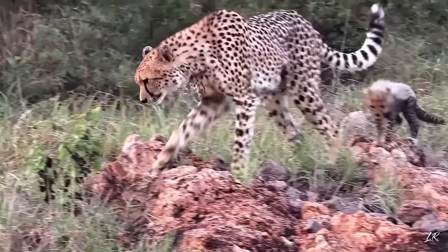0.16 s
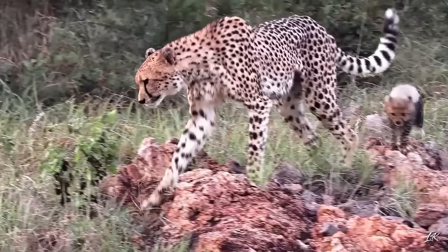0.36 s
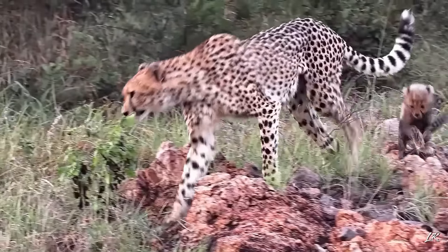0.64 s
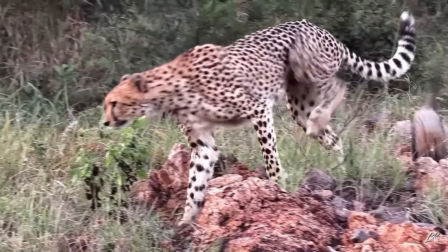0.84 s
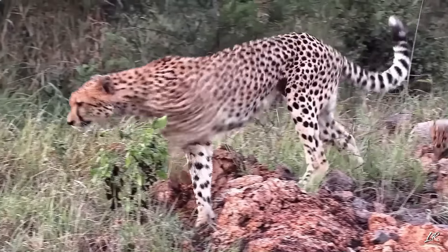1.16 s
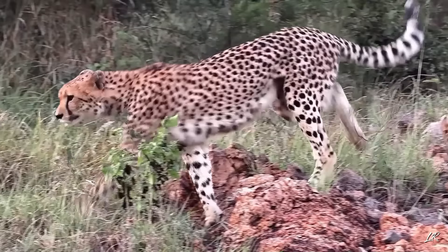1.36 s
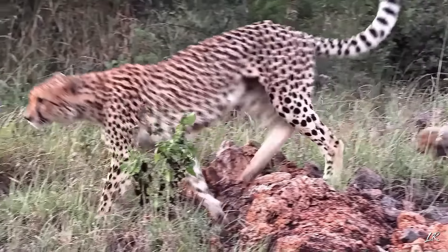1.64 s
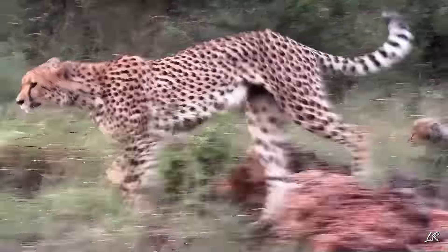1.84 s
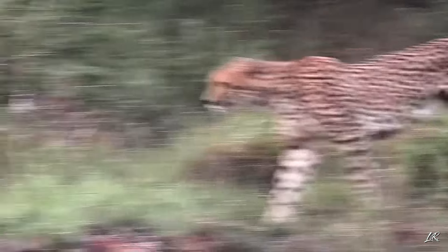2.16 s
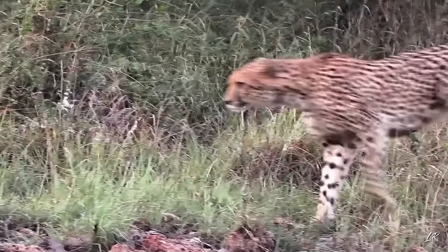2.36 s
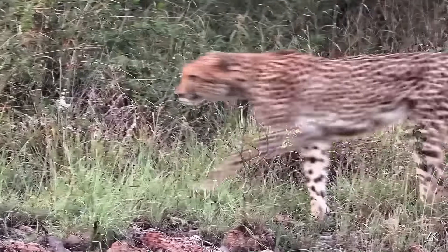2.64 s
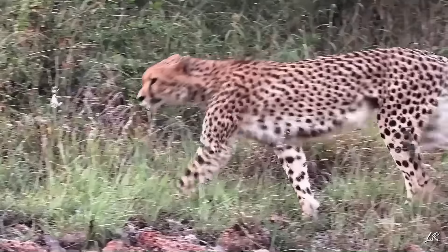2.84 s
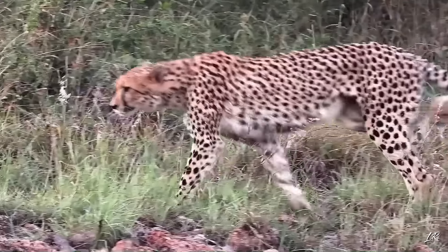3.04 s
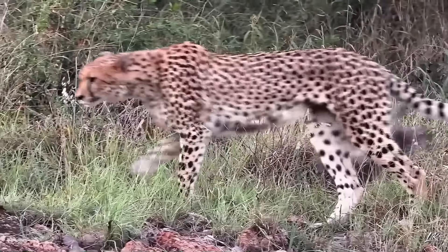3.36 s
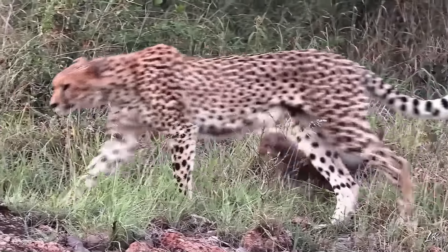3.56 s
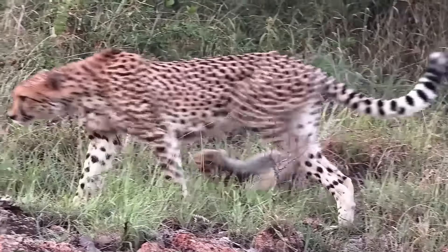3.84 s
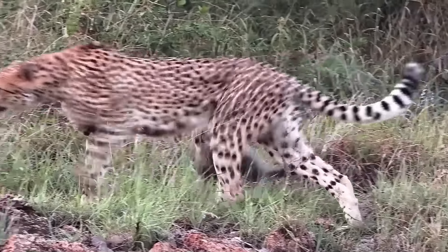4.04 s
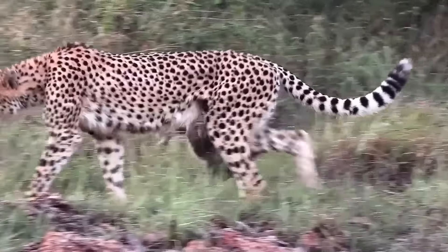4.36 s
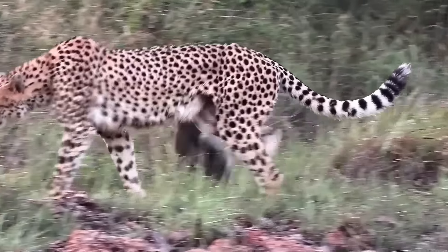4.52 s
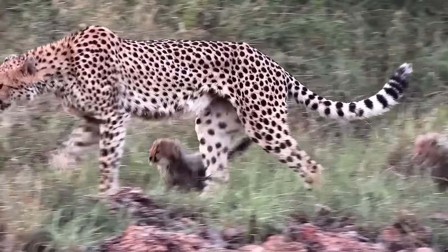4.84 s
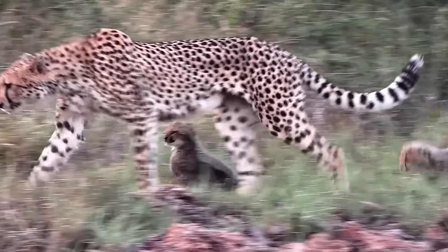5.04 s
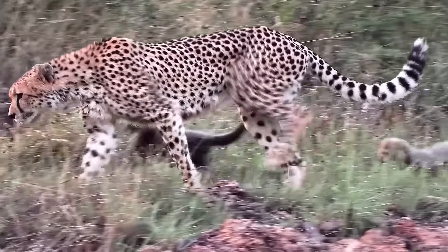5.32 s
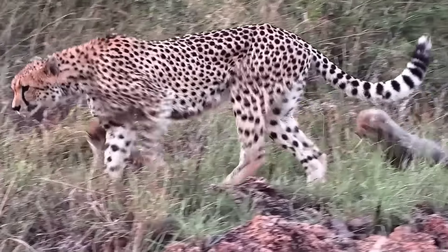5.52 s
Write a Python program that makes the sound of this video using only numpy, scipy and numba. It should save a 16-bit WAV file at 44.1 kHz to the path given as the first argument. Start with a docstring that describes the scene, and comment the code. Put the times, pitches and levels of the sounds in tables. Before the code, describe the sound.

Out in open scrub, two birds chirp in a quick duet from start to finish, one close with hoarse, falling notes, the other higher and huskier. A far bird adds faint pips. Low gusts of wind bump the microphone in three spells over a soft rustle of leaves. A faint idling engine fades early on, and paws lightly brush the grass near the end.

```python
"""In the bushveld, two ground birds call in a quick duet of hoarse falling chirps: harmonic tones of the
syrinx, coloured by throat resonances, mixed with breath noise and returned by scrub and rocks.
A far bird adds low pips and paws brush the grass. Turbulent wind buffets the microphones,
while behind it distant leaves rustle and the firing tones of an idling engine fade."""
import sys
import numpy as np
from scipy import signal
from scipy.io import wavfile
from scipy.ndimage import uniform_filter1d, map_coordinates
from numba import njit

SR = 44100
rng = np.random.default_rng(int(sys.argv[2]) if len(sys.argv) > 2 else 0)


def transcribe(u):
    """Save the signal u as a 16-bit wav file named by the first command-line argument.

    u: samples, shape (n,) or (channels, n), limited to [-1, 1]; the rate is SR.
    q: integer samples, one column per channel.
    """
    v = np.clip(np.atleast_2d(u).T, -1, 1)
    q = np.round(v * 32767).astype(np.int16)
    wavfile.write(sys.argv[1], SR, q)


N = 250618
T = np.arange(N) / SR
SIDE = np.array([[1], [-1]])  # adds on the left, subtracts on the right


def undb(db):
    """Amplitude ratio: tenfold for every 20 dB."""
    return 10 ** (np.asarray(db) / 20)


def unit(x):
    """Normalisation to an RMS of 1."""
    return x / np.sqrt(np.mean(x ** 2))


@njit
def svf(x, hz, width):
    """Two-pole resonance: a state-variable band-pass with gain 1 at its moving centre."""
    y, mid, low = np.empty(len(x)), 0., 0.
    for i in range(len(x)):
        g, damping = np.tan(np.pi * hz[i] / SR), width[i] / hz[i]
        v = (mid + g * (x[i] - low)) / (1 + g * (g + damping))
        mid, low, y[i] = 2 * v - mid, low + 2 * g * v, damping * v
    return y


def band(x, hz, width, passes=1):
    """Resonances in cascade, centre and width in Hz: each pass steepens the skirts."""
    for _ in range(passes):
        x = svf(x, hz + 0 * T, width + 0 * T)
    return x


def walk(rate):
    """Random modulation: levels held 1 / rate seconds and smoothed twice, with an RMS of 1."""
    hold = max(int(SR / rate), 1)
    steps = np.repeat(rng.standard_normal(N // hold + 1), hold)
    return unit(uniform_filter1d(uniform_filter1d(steps, hold), hold)[:N])


def swell(start, length, rise, fall):
    """Envelope of one event: a soft rise up to start, a plateau, then exponential decay."""
    attack = np.clip((T - start) / rise + 1, 0, 1) ** 2
    return attack * np.exp(-np.clip(T - start - length, 0, None) / fall)


def bush():
    """Incoherent noise of distant leaves and air: bands flicker alone, the bass alike on both sides."""
    # Each row: frequency in Hz, relative spectral density in dB.
    spectrum = [(88, -33), (150, -6.5), (371, -14), (433, -5.5), (556, -16.5), (1010, -13.5), (1160, -23.5),
                (2360, -9.5), (2550, -19.5), (2970, -11), (15000, -32.5)]
    # Each row: time in seconds, gain of the treble rustle in dB.
    leaves = [(0, -1.5), (4.2, 1), (4.7, -0.5), (5.3, -1.5), (5.4, -4), (5.68, -2)]
    freqs, density_db = np.transpose(spectrum)
    rustle_db = np.interp(T, *np.transpose(leaves))
    out = 0
    for hz in 170 * 2 ** np.arange(0, 6.6, .5):  # half-octave steps
        mid, side = (band(rng.standard_normal(N), hz, hz / 3) for _ in range(2))
        db = np.interp(np.log(hz), np.log(freqs), density_db) + walk(8.7)
        db += min(hz / 2560, 1) * rustle_db
        out += undb(db) * (mid + min(hz / 1500, 1) * side * SIDE)
    return undb(-41) * unit(out)


def engine():
    """Periodic firing: tones waver together with the idling speed, fade, then return faintly."""
    # Each row: time in seconds, relative level in dB.
    fade = [(0, -49), (1.2, -56), (2.2, -71), (2.8, -79), (5.68, -63.5)]
    # Each row: frequency in Hz, relative level in dB.
    firing_tones = [(74, 4), (220, -8), (542, -12)]
    crank_time = np.cumsum(1 + .012 * walk(5)) / SR
    tones = sum(undb(db + 2.5 * walk(9)) * np.sin(2 * np.pi * hz * crank_time)
                for hz, db in firing_tones)
    return 3.8 * undb(np.interp(T, *np.transpose(fade))) * tones


def wind():
    """Turbulence on the microphone housing: low thumps over an uneven rumble, alike on both sides."""
    # Each row: start in seconds, length in seconds, level in dB.
    buffets = [(0.256, 0.028, -29), (0.317, 0.057, -26), (0.396, 0.018, -27), (0.573, 0.016, -27.5),
               (0.618, 0.029, -30), (0.645, 0.084, -36.5), (0.823, 0.012, -25), (0.861, 0.037, -31.5),
               (0.927, 0.04, -30.5), (1.015, 0.03, -33), (2.3, 0.025, -30.5), (2.403, 0.01, -30),
               (2.583, 0.05, -36.5), (2.672, 0.036, -22.5), (2.722, 0.047, -31), (2.86, 0.0069, -25.5),
               (2.952, 0.019, -29), (2.993, 0.01, -22), (4.131, 0.028, -33.5), (4.191, 0.02, -27.5),
               (4.262, 0.014, -23.5), (4.377, 0.0084, -26), (4.498, 0.032, -25.5), (4.74, 0.014, -27),
               (4.966, 0.014, -27), (5.164, 0.017, -21), (5.194, 0.035, -24.5), (5.234, 0.015, -20),
               (5.259, 0.022, -27.5), (5.326, 0.012, -28), (5.549, 0.01, -32)]
    # Each row: time in seconds, level of the rumble in dB.
    rumble_levels = [(0.0, -39.5), (0.2, -42.5), (1.45, -48), (2.75, -46), (2.91, -38), (3.07, -41.5),
                     (3.34, -57.5), (4.05, -50), (4.45, -37), (4.93, -42.5), (5.33, -37), (5.52, -52)]
    hz, level = np.full(N, 100.), np.zeros(N)
    for start, length, db in buffets:
        hz[T > start - .01] = 108.5 * np.exp(.035 * (db + 33))  # harder buffets sit higher
        level += undb(db) * swell(start, length, rise=.0034, fall=.0041)
    eddies = rng.standard_normal(N) * undb(6.6 * walk(60))
    tuned = band(band(eddies, hz, 1.45 * hz), hz, 1.22 * hz)
    thumps = unit(band(tuned, 51, 128))
    thumps /= np.sqrt(uniform_filter1d(thumps ** 2, 1100) + .04)  # every buffet carries its full weight
    slaps = undb(8) * unit(band(eddies, 342, 380, passes=3))
    blows = level * thumps + level ** 2 * slaps  # the bright edge grows with the square of the blow
    flow = rng.standard_normal(N) * undb(4.1 * walk(25.066))
    rumble = unit(band(band(flow, 71, 115), 86, 148))
    pressure = blows + undb(np.interp(T, *np.transpose(rumble_levels))) * rumble
    return pressure * (1 + .04 * walk(40) * SIDE)


def grass():
    """Friction of passing paws on stalks: brief, dull crackles of noise."""
    # Each row: start in seconds, length in seconds, level in dB.
    rustles = [(3.998, 0.02, -41.5), (4.052, 0.0052, -41), (4.133, 0.048, -43), (4.73, 0.0088, -46),
               (5.621, 0.012, -37)]
    level = sum(undb(db) * swell(start, length, rise=.0015, fall=.0061) for start, length, db in rustles)
    stalks = rng.standard_normal((2, N)) * undb(3 * walk(150))
    mid, side = (unit(band(noise, 680, 550)) for noise in stalks)
    return level * (mid + .12 * side * SIDE)


def scrub(x, direct_db, cluster_db, cluster_s, left_lag_s, coherence):
    """Scattering: direct sound, a cluster of scrub echoes and a faint reverberant tail from far slopes."""
    t = T[:SR // 2]
    shared, own = rng.standard_normal((2, len(t))) / np.sqrt(SR) * np.clip(t / .0023, 0, 1)
    response = np.array([shared, coherence * shared + np.sqrt(1 - coherence ** 2) * own])
    cluster = np.outer(undb(cluster_db), np.exp(-(t / cluster_s) ** 4)) / np.sqrt(cluster_s)
    slopes_db, slopes_s = -17, .12
    response *= cluster + undb(slopes_db) * np.exp(-t / slopes_s) / np.sqrt(slopes_s)
    response[:, 0] += undb(direct_db)
    delay = np.sinc(np.arange(32) - 8 - left_lag_s * SR)
    response[0] = np.convolve(response[0], delay)[8:len(t) + 8]
    return signal.fftconvolve(x[None], response, axes=1)[:, :N]


def rocks(x):
    """Reflection from rock faces: distinct slap echoes in the band that they return best."""
    # Each row: delay in seconds, offset of the left delay in seconds, left and right gains in dB.
    faces = [(0.018, -0.0056, -9.5, -3.5), (0.037, 0.002026, -20, -16)]
    reflected = band(x, 2850, 750, passes=2)
    late = lambda seconds: map_coordinates(reflected, [(T - seconds) * SR])
    return sum(np.array([undb(left) * late(delay + lag), undb(right) * late(delay)])
               for delay, lag, left, right in faces)


def far_bird():
    """Nearly pure tones: short, soft pips that glide down a little."""
    # Each row: start in seconds, relative level in dB.
    pips = [(0.346, -39), (0.575, -32), (2.491, -35), (2.69, -34.5), (2.89, -37.5), (3.083, -35),
            (3.264, -35), (3.446, -34), (3.622, -35), (3.982, -42), (4.338, -34), (4.514, -33),
            (4.735, -30), (4.946, -30)]
    out = np.zeros(N)
    for start, db in pips:
        t = np.clip(T - start, -.05, .1)
        cycles = 986 * (1.03 * t - .69 * t ** 2)
        out += undb(db) * swell(start, .029, rise=.0046, fall=.0015) * np.sin(2 * np.pi * cycles)
    return .36 * out * undb(5 * walk(160))


def voice(notes, partials, waver, rattle_db, swoop, swoop_s, voiced_s, hook, release_s):
    """Source and filter: harmonics dive as the syrinx slackens, roughened by rattle and breath."""
    # Resonances that lift the partials. Each row: centre in Hz, width in Hz, added path's gain in dB.
    throat = [(2850, 450, 8.5), (3790, 260, 3), (4480, 260, 1.5), (6480, 800, 0)]
    # Bands of breath through the beak. Each row: centre in Hz, width in Hz, relative level in dB.
    beak = [(2250, 3860, 10.5), (3240, 3030, 18.5), (5160, 1600, 3.5), (6220, 490, -2.5), (8790, 380, 2.5),
            (10900, 1700, 0)]
    hz = np.full(N, 1500.)
    level, second_db, third_db, voiced, breath_db = np.zeros((5, N))
    for start, length, pitch, drop, db, second, third, airy, rise in notes:
        on = T > start - rise
        age = T[on] - start
        along = np.clip(age / length, -.12, 1.25)
        above = swoop * np.exp(-(age + rise) / swoop_s)  # the note swoops in from above
        end_dive = hook * np.clip(along - .8, 0, 1) ** 2
        hz[on] = pitch * (1 + above + drop * (.5 - along - end_dive))
        voiced[on] = np.exp(-np.clip(age, 0, None) / voiced_s)  # the tone thins towards breath
        second_db[on], third_db[on], breath_db[on] = second, third, airy
        level += undb(db) * swell(start, length, rise, release_s)
    phase = 2 * np.pi * np.cumsum(hz * (1 + waver * walk(200))) / SR
    tone = np.zeros(N)
    for k, db in enumerate(partials, 1):
        partial_db = db + rattle_db * walk(110) + (k == 2) * second_db + (k == 3) * third_db
        tone += np.sqrt(2) * undb(partial_db) * np.sin(k * phase)
    tone += sum(undb(db) * band(tone, centre, width) for centre, width, db in throat)
    air = rng.standard_normal(N) * undb(3.9 * walk(90))
    breath = unit(sum(undb(db) * unit(band(air, centre, width, passes=2)) for centre, width, db in beak))
    return level * (voiced * tone + undb(breath_db) * breath)


def answering_bird():
    """Turbulent breath over a harmonic tone: higher, huskier falling notes."""
    # Each row: start in seconds, length in seconds, pitch in Hz, level in dB, breath gain in dB.
    answers = [(0.046, 0.065, 1950, -38, 8), (0.137, 0.048, 1984, -35.5, 4), (0.191, 0.1, 1928, -31.5, 2),
               (0.325, 0.045, 1980, -37, 6.5), (0.41, 0.074, 1990, -39, 8), (0.528, 0.061, 1940, -36.5, 8),
               (0.763, 0.053, 1937, -37.5, 4), (0.868, 0.13, 2010, -29.5, -3.5),
               (1.094, 0.042, 1953, -33.5, 2), (1.166, 0.11, 1946, -40.5, 6.5),
               (1.383, 0.059, 1977, -36, 2.5), (1.607, 0.087, 1860, -36.5, 2.5),
               (1.713, 0.087, 1785, -40, 1), (2.173, 0.045, 1903, -36.5, 3.5),
               (2.25, 0.092, 1782, -37.5, 3.5), (2.465, 0.057, 1867, -37, 3.5),
               (2.849, 0.087, 2033, -36.5, 6.5), (2.962, 0.06, 2047, -38.5, 4),
               (3.165, 0.027, 1793, -38, 5), (3.238, 0.057, 2043, -31.5, -0.5),
               (3.311, 0.039, 1948, -40, 6.5), (3.411, 0.072, 2040, -35, 5), (3.626, 0.086, 1953, -38, 2.5),
               (3.746, 0.039, 1960, -30, 2), (3.801, 0.053, 1940, -33, -1), (4.076, 0.049, 1900, -35, 2.5),
               (4.167, 0.045, 1845, -41, 11), (4.221, 0.096, 1938, -29, 2), (4.359, 0.056, 1895, -37.5, 4),
               (4.912, 0.067, 1920, -42, 7.5), (4.991, 0.072, 1836, -38.5, 0),
               (5.084, 0.055, 2044, -40, 7.5), (5.231, 0.059, 1856, -41.5, 4), (5.6, 0.066, 1893, -41, 9.5)]
    # Relative levels of the harmonics in dB, fundamental first.
    partials = [-8, -6, -11.5, -18.5]
    drop, rise_s = .1, .02  # drop: share of pitch lost over a note
    notes = [(start, length, hz, drop, db, 0, 0, airy, rise_s) for start, length, hz, db, airy in answers]
    return voice(notes, partials, waver=.021, rattle_db=4.5, swoop=.11, swoop_s=.014,
                 voiced_s=.31, hook=.55, release_s=.011)


def near_bird():
    """Frequency sweeps of the syrinx: steeply diving chirps among flatter held notes."""
    # Each row: start in seconds, pitch in Hz, level in dB, gain of the second harmonic in dB.
    chirps = [(0.0, 1401, -26, -4.5), (0.445, 1434, -22.5, 1.5), (0.61, 1403, -24, 3.5),
              (0.664, 1415, -22.5, 3.5), (0.996, 1415, -24.5, 2), (1.253, 1435, -31.5, 7),
              (1.294, 1452, -24.5, -2), (1.513, 1400, -24.5, 1), (1.788, 1383, -25, 2),
              (1.937, 1382, -23, 3.5), (2.062, 1396, -24, 3.5), (2.331, 1370, -30, 3.5),
              (2.37, 1472, -24, -2), (2.596, 1382, -24.5, 0.5), (2.746, 1493, -23, 7),
              (3.551, 1462, -22, -3), (3.725, 1527, -27.5, -1), (3.78, 1411, -27, 10),
              (3.956, 1428, -25.5, -4.5), (4.487, 1392, -24.5, 1), (4.633, 1428, -24.5, 2.5),
              (4.808, 1410, -25.5, 0), (5.077, 1520, -37, 7), (5.115, 1418, -29.5, -1.5),
              (5.519, 1366, -24.5, 2.5)]
    # Each row: start in seconds, pitch in Hz, level in dB, gains of harmonics two and three in dB.
    held = [(0.178, 1495, -25.5, -4, -4), (0.226, 1436, -22.5, 2.5, -8), (0.532, 1440, -29.5, -6, -4),
            (0.85, 1531, -25, 2.5, -5), (0.885, 1479, -22.5, -3.5, -7.5), (0.924, 1396, -32.5, 3.5, -10),
            (3.02, 1470, -29.5, 2.5, -16), (3.051, 1501, -25.5, -1.5, -6.5), (3.212, 1517, -23, -24, -3.5),
            (3.261, 1410, -23, -7, -8), (3.33, 1451, -23, -2, -10), (3.815, 1389, -25, -2, -8),
            (4.197, 1551, -28.5, -5, -1), (4.248, 1420, -24, -1.5, -1.5)]
    # Relative levels of the harmonics in dB, fundamental first.
    partials = [-16.5, -9, -7, -18, -25, -27, -28]
    chirp_s, chirp_drop, chirp_rise_s = .028, .19, .02
    held_s, held_drop, held_rise_s = .037, .055, .024
    breath_db = -5.5
    notes = [(start, chirp_s, hz, chirp_drop, db, second, 0, breath_db, chirp_rise_s)
             for start, hz, db, second in chirps]
    notes += [(start, held_s, hz, held_drop, db, second, third, breath_db, held_rise_s)
              for start, hz, db, second, third in held]
    return voice(sorted(notes), partials, waver=.017, rattle_db=3.8, swoop=.016, swoop_s=.006,
                 voiced_s=.18, hook=.1, release_s=.007)


def scene():
    """Superposition: each bird arrives by its own paths, over wind, engine, leaves and grass."""
    # Direct sound, then echo cluster. Each row: left gain in dB, right gain in dB.
    near_path = (-5, -5), (-9, -8)
    near, answer = near_bird(), answering_bird()
    birds = rocks(near) + scrub(near, *near_path, cluster_s=.054, left_lag_s=.00015, coherence=.14)
    birds += scrub(answer, (-6, -5), (-5, -3), cluster_s=.025, left_lag_s=.00021, coherence=.027)
    birds += scrub(far_bird(), (-3, -6), (-2, -1), cluster_s=.018, left_lag_s=.00024, coherence=.29)
    return birds + wind() + engine() + bush() + grass()


def record(dry):
    """Directivity: the right microphone faces the birds and hears more presence. The top is cut steeply."""
    # Two narrow, steady gaps in the treble. Each row: centre in Hz, width in Hz.
    gaps = [(7700, 760), (9650, 1040)]
    presence = np.array([band(mic, 5000, 3000) + band(mic, 1250, 900, passes=2) for mic in dry])
    heard = dry - .19 * SIDE * presence
    for hz, width in gaps:
        for _ in range(2):
            heard -= np.array([band(channel, hz, width) for channel in heard])
    top_cut = signal.ellip(12, .2, 80, 15250, fs=SR, output="sos")
    return signal.sosfilt(top_cut, heard)


dry = scene()
out = record(dry)
transcribe(out)
```